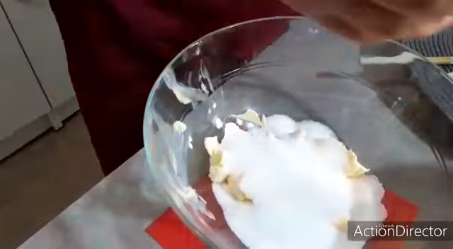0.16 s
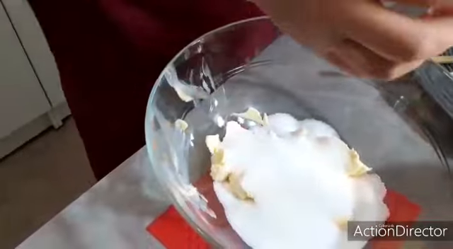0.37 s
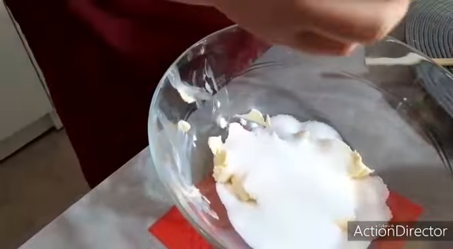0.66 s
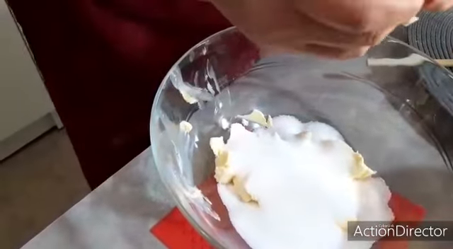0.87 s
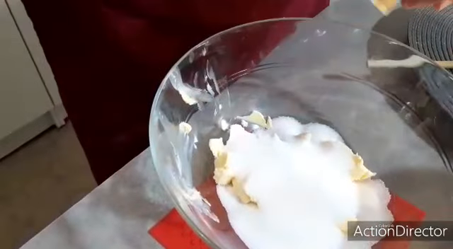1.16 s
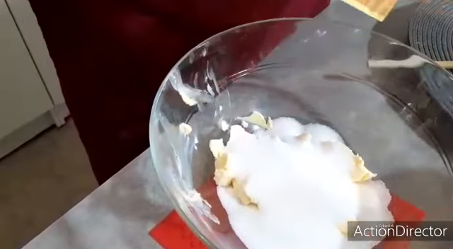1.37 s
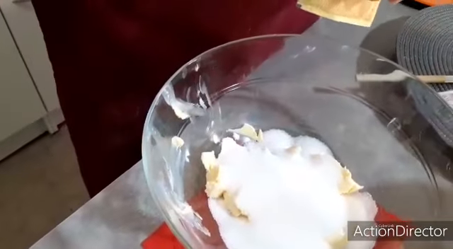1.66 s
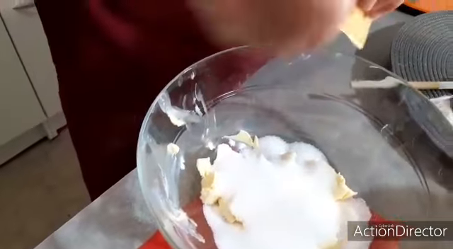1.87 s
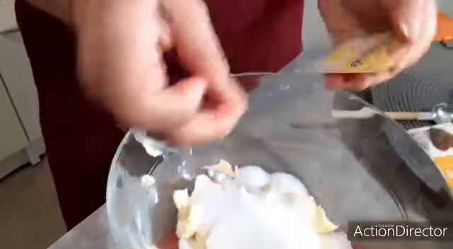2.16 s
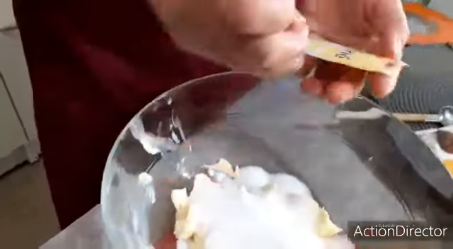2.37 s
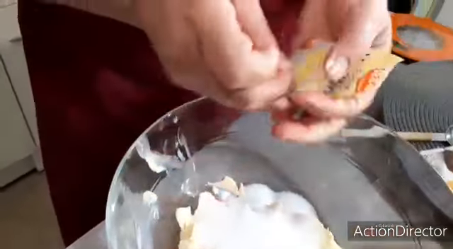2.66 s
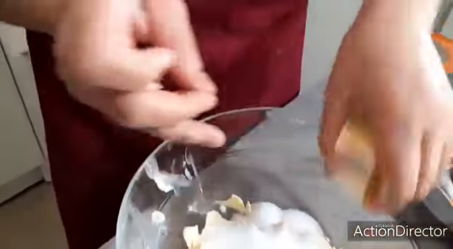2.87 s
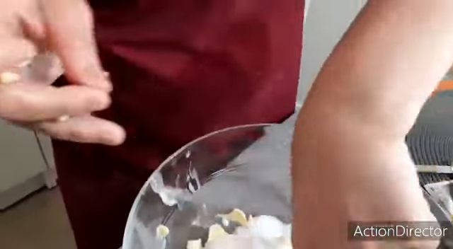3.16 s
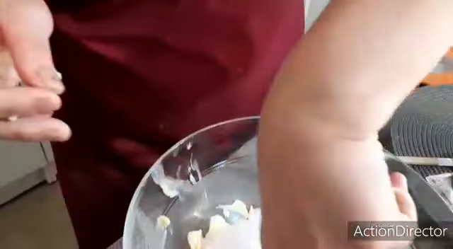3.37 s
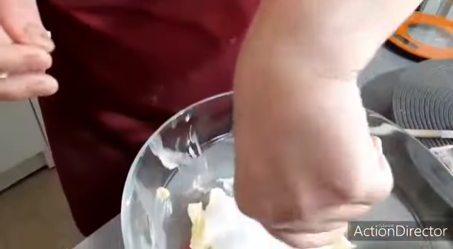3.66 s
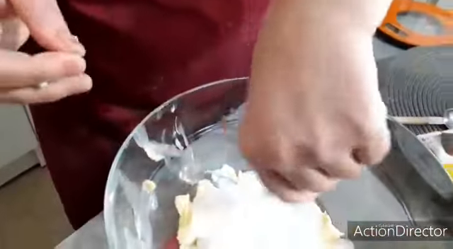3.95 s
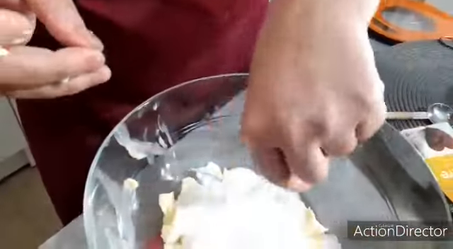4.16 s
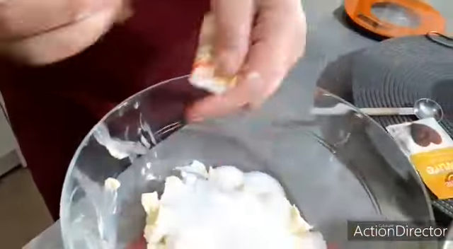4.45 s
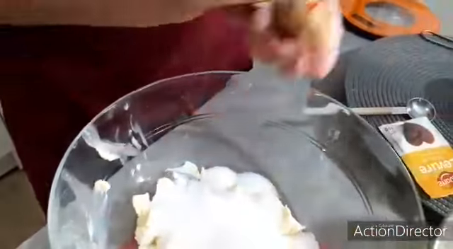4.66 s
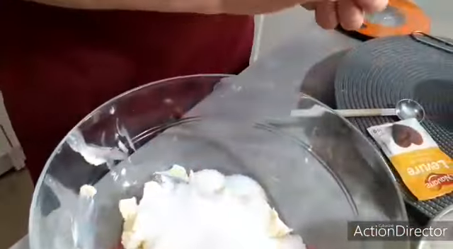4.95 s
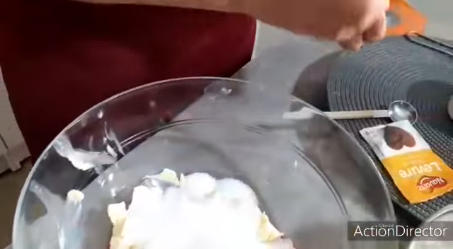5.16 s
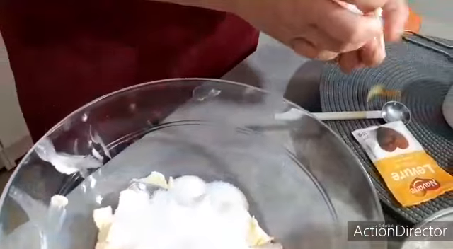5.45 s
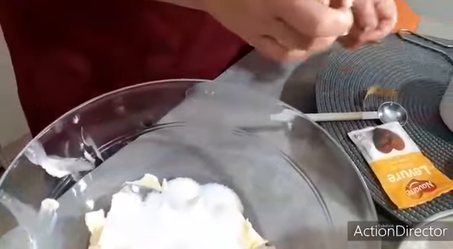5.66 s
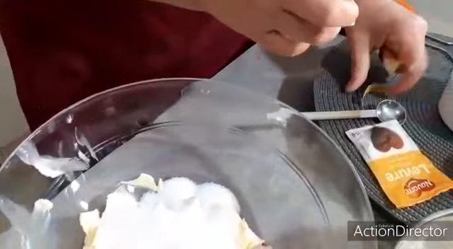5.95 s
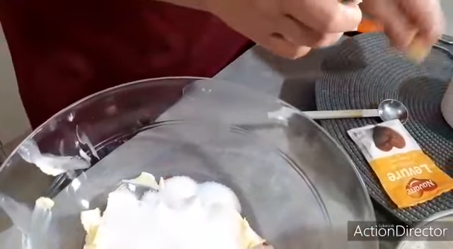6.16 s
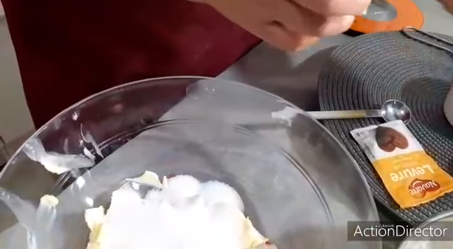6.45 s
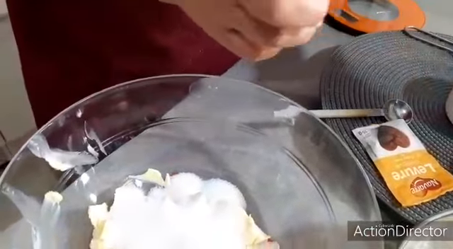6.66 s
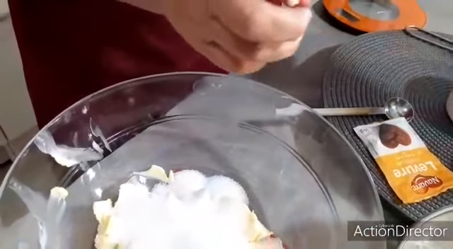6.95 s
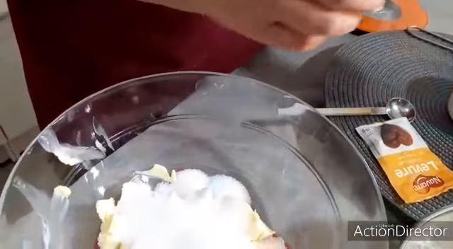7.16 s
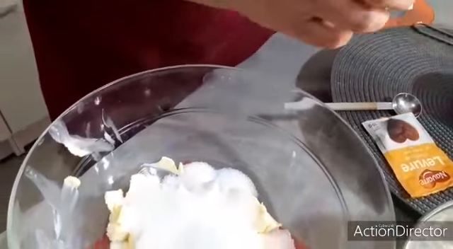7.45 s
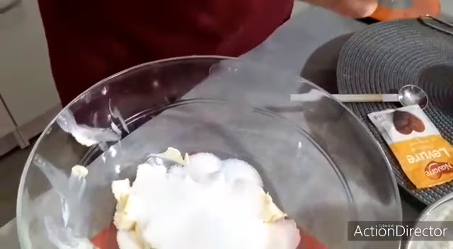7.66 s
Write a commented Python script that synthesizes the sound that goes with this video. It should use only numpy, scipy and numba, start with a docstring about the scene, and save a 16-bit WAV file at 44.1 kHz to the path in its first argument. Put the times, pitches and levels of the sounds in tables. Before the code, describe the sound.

In a small, still kitchen, a paper sachet crackles close to the microphone. Soft fiddling leads to a quick rip and more rustling as it is opened and shaken empty over a glass mixing bowl, which rings hollowly when knocked. Dense, sharp crumpling follows, then higher, crisper folding with short pauses. A few soft, low handling thumps sit underneath.

```python
"""Crisp snaps and rustling: fingers work a paper sachet, then tear it open, shake it out and crumple it.
Small kitchen, over a glass mixing bowl, close to the two microphone ports of a phone.
Creases buckle and ring small flaps of paper; in between, the sheet slides and crackles finely.
The bowl rings hollowly when the hand dips in and takes a few knocks; handling adds soft low thumps.
The room answers every snap over a faint bed of still air."""
import sys
import numpy as np
from scipy import signal
from scipy.fft import rfft, irfft
from scipy.io import wavfile
from scipy.ndimage import uniform_filter1d
from numba import njit

SR = 44100
rng = np.random.default_rng(int(sys.argv[2]) if len(sys.argv) > 2 else 0)


def dump(signal):
    """Clip the signal to [-1, 1] and save it as 16-bit WAV at the path in sys.argv[1]."""
    limited = np.clip(np.atleast_2d(signal).T, -1, 1)
    pcm = np.round(limited * 32767).astype(np.int16)
    wavfile.write(sys.argv[1], SR, pcm)


N = 344024

# Paper at close range, spectra of the ringing sheet, rubbing fibres and cracking fibres: f/Hz, level/dB
SHEET_SPECTRUM = [(500, -61), (900, -16), (1300, 2.5), (1900, 5.5), (2800, 5), (4200, 2.5), (5500, -6.5),
                  (9000, -35.5)]
FIBRE_SPECTRUM = [(2000, -18.5), (3600, -2.5), (4800, 3), (7500, 1.5), (10000, 1.5), (12300, 1), (15500, 0)]
CRACK_SPECTRUM = [(2000, -25), (3600, -1), (5000, -1), (7500, -4), (10000, -8.5), (12300, -2.5),
                  (15500, -7.5)]
# The sachet's hollow body, strong when full or shaken, weak once crushed flat: t/s, level/dB
HOLLOW_BODY = [(0, -5), (.28, -5.5), (.6, -5.5), (.9, -4), (1.3, -14.5), (1.6, -10), (1.85, -0.5),
               (2.05, -9), (2.7, -18.5), (3.0, -14.5), (3.3, -27), (3.41, -4), (3.53, -5), (3.85, -28),
               (4.22, -9), (4.45, -17), (4.7, -15), (4.82, -34), (4.94, -17.5), (5.1, -34.5), (6.25, -35.5),
               (6.5, -29.5), (6.7, -39), (6.89, -20.5), (7.35, -51), (7.66, -28), (7.74, -5.5)]
# Creases that stand out, close to the microphone: t/s, level/dB, flap f/Hz, relative crack level/dB
CREASE_SNAPS = [(.046, -31.5, 2750, 0), (0.0562, -37, 4250, -5), (0.153, -38, 1940, 5),
                (.226, -40, 6200, 3), (.2508, -38.5, 2400, -6), (0.286, -23, 3250, 2),
                (0.346, -42, 5940, 12), (.352, -29.5, 3320, -1), (0.4903, -49, 5200, 7),
                (0.5076, -43.5, 6740, 11), (0.5269, -29, 1650, 2.5), (.585, -29.5, 930, -3.5),
                (0.8279, -39, 1900, -3), (0.8544, -43, 1770, -14), (.976, -42.5, 2820, 3),
                (0.9953, -29.5, 2800, 2.5), (1.2075, -31.5, 1680, -12), (1.2991, -32, 2350, 4.5),
                (1.304, -30, 6720, -7), (1.3117, -28.5, 6550, -1), (1.3783, -36, 1820, -7),
                (1.424, -43, 5400, 2), (1.431, -42, 1850, -4), (1.4774, -38, 1850, 5.5),
                (1.514, -44, 1490, -11), (1.616, -37, 4600, 0.5), (1.7897, -28, 1070, -4.5),
                (1.9411, -24, 2100, -9), (2.0073, -28, 1900, 6.5), (2.0475, -23.5, 1890, -7),
                (2.181, -48.5, 1640, -20), (2.412, -41.5, 6530, 4), (2.438, -45.5, 1280, -7),
                (2.4712, -38.5, 4300, 2.5), (2.5205, -33.5, 3700, -5), (2.571, -44, 7490, 9),
                (2.6149, -26.5, 2840, 9), (2.6935, -33, 3800, 10), (2.697, -24.5, 6140, 0.5),
                (2.7275, -34.5, 1850, 3), (2.8718, -34, 1910, -30), (2.897, -33, 2740, 1.5),
                (2.9062, -34, 1850, -11), (3.0222, -22, 5040, -7.5), (3.3244, -30.5, 2860, -19),
                (3.405, -27.5, 2000, 2.5), (3.4224, -20.5, 1980, -22), (3.4298, -22.5, 2130, 5.5),
                (3.491, -22, 2980, 4.5), (3.51, -24, 1470, 0), (3.531, -19, 1410, -3),
                (3.563, -25, 1575, 4), (3.8572, -43.5, 2900, 1), (3.988, -31, 5000, 8),
                (4.0898, -26, 2450, -2), (4.1041, -15.5, 960, 2), (4.1157, -14, 4500, 2),
                (4.1964, -24.5, 2260, 13), (4.2206, -23, 6920, 11), (4.226, -17, 930, -4),
                (4.406, -25.5, 4700, -9), (4.4303, -25, 7190, 6), (4.4464, -24, 4460, 9.5),
                (4.514, -21, 1170, 2), (4.526, -18.5, 5770, -23), (4.547, -23.5, 3120, 4.5),
                (4.587, -22, 1250, -16.5), (4.6083, -28.5, 7260, 8), (4.6667, -19, 3700, -5),
                (4.678, -20.5, 1140, -18), (4.695, -22.5, 4570, -15), (4.7057, -19, 3520, -3),
                (4.7152, -13.5, 3530, -6.5), (4.763, -20, 7550, 0), (4.7736, -27.5, 3490, 2),
                (4.7801, -25.5, 5040, 11), (4.806, -22, 2900, -12), (4.8434, -21.5, 3300, 7.5),
                (4.8525, -18, 7640, -7), (4.8586, -21, 7600, -5), (4.9023, -29.5, 1370, 4),
                (4.9141, -22, 7400, -13), (4.921, -23.5, 7350, -15), (4.9354, -21.5, 1640, -1),
                (4.942, -22, 3480, 1.5), (5.0408, -23, 1730, 7), (5.0921, -32.5, 1550, 5.5),
                (5.1251, -24.5, 1500, -15), (5.206, -36.5, 3470, -0.5), (5.444, -49.5, 2450, -5),
                (5.502, -45, 2610, 3), (5.6462, -34, 2000, -18), (5.661, -29, 7850, 0.5),
                (5.7219, -26.5, 1700, -11), (5.743, -27, 1980, 5.5), (5.765, -26.5, 2200, 3.5),
                (5.7944, -23.5, 2480, 7.5), (5.815, -20.5, 5550, -1.5), (5.868, -19, 5160, -1),
                (5.949, -40.5, 4000, 0), (6.08, -39, 7300, 3), (6.2324, -44.5, 4030, -2),
                (6.2661, -25, 5300, -10), (6.3242, -37, 5700, 4.5), (6.331, -36.5, 2150, 3.5),
                (6.34, -30, 6430, -30.5), (6.3798, -28.5, 8000, 1), (6.4524, -32.5, 7490, -1),
                (6.4727, -27.5, 5100, 13), (6.476, -26.5, 3470, -3.5), (6.5401, -25.5, 2560, 2),
                (6.5449, -18, 6600, 4), (6.57, -33, 4660, -13), (6.6355, -37, 5070, 3),
                (6.649, -29.5, 5100, -5), (6.6745, -18, 5200, -22), (6.6898, -31.5, 2900, 3),
                (6.6957, -25.5, 4950, 7.5), (6.7261, -31.5, 6800, 5.5), (6.758, -39, 4820, 0),
                (6.7782, -38, 3920, 11), (6.8249, -24, 2600, -7), (6.8283, -22.5, 4800, -17),
                (6.8875, -19.5, 2350, -3.5), (6.9195, -39.5, 7280, 13.5), (7.242, -42, 4300, -9),
                (7.353, -42.5, 6430, 12), (7.4557, -43.5, 3700, -15), (7.7445, -30.5, 2730, -3)]


def snaps(hands_side_db, slip_db=-15, crack_slip_db=-12, sheet_db=-5, thud_hz=680, crease_hz=9500):
    """A crease gives way in a jump and tiny slips: flap and sheet ring, fibres crack, the sachet thuds."""
    size = 1024
    out, t = np.zeros((2, N + size)), np.arange(size) / SR
    jump = 1. * (t == 0)
    no_bass, only_top = (signal.butter(2, hz, "high", fs=SR) for hz in (290, 11500))
    edge = unit(signal.filtfilt(*only_top, np.roll(jump, 12)))
    hollow_db, = curves(HOLLOW_BODY)
    for s, db, flap_hz, crack_db in CREASE_SNAPS:
        start = int(s * SR)
        # each crease faces its own way, near where the hands are
        side_db = hands_side_db[start] + 2 * rng.standard_normal()
        push = jump + undb(slip_db) * stereo_noise(size, 0.63) * fade(t, t60=0.016)
        slips = jump + undb(crack_slip_db) * stereo_noise(size, 0.062) * fade(t, t60=0.015)
        sheet = unit(colour(push, SHEET_SPECTRUM))
        flap_drive = colour(push, SHEET_SPECTRUM if flap_hz < 4500 else FIBRE_SPECTRUM)
        flap = unit(resonate(flap_drive, flap_hz, q=4.2)) + undb(sheet_db) * sheet
        # every crease has its own length, so every crack its own brightness
        crease = resonate(slips, crease_hz * 2 ** rng.uniform(-0.64, 0.74), q=3)
        # the harder it buckles, the sharper the leading edge
        edge_db = -2 + min(db + crack_db + 16, 0) / 2
        crack = unit(colour(slips + 1.1 * crease, CRACK_SPECTRUM)) + undb(edge_db) * edge
        body = resonate(resonate(push.mean(axis=0), thud_hz, q=0.85), thud_hz, q=0.65)
        thud = unit(signal.lfilter(*no_bass, body))
        snap = (undb(-1) * flap * pan(side_db / 2)
                + undb(crack_db) * crack * pan(side_db)
                + undb(hollow_db[start] - 1) * thud)
        out[:, start:start + size] += undb(db) * np.sqrt(SR / 1000) * snap
    return out[:, :N]


# Paper sliding on paper and skin, close up. Fingering first; the top rips off at 1.9 s, opened wide at
# 2.5 s, powder slides out at 3 s, shaken empty from 3.4 s, then crumpled and, from 6 s, folded small.
# start t/s, swell/s, hold/s, level/dB, free sheet f/Hz, relative fibre hiss level/dB
SLIDING_STROKES = [(0, 0.013, 0.064, -45, 3320, -1), (0.114, 0.11, 1.2, -69, 2900, 7.5),
                   (0.126, 0.017, .09, -54.5, 3020, 2.5), (0.274, 0.0045, .07, -44.5, 2960, 5),
                   (0.485, 0.011, 0.12, -53.5, 2650, 4.5), (0.673, 0.032, 0.046, -53.5, 2400, 8),
                   (0.786, .02, .04, -60.5, 2070, 2), (.89, 0.0067, 0.16, -54.5, 2600, 3.5),
                   (1.097, 0.11, 0.035, -64.5, 2610, 9), (1.283, 0.025, 0.018, -48.5, 2430, 2),
                   (1.36, 0.017, 0.15, -61, 2300, -2.5), (1.613, 0.0073, 0.025, -62.5, 2900, 1),
                   (1.783, 0.0073, .11, -56.5, 1730, 3), (1.907, 0.019, 0.044, -35.5, 1950, 4.5),
                   (1.969, 0.034, 0.05, -33, 2660, 4.5), (2.246, 0.017, 0.11, -77.5, 2365, 12.5),
                   (2.395, 0.0036, .11, -55.5, 3280, 7.5), (2.514, .01, 0.0099, -41, 3830, 3.5),
                   (2.585, 0.021, 0.028, -40.5, 3700, 5), (2.665, 0.018, 0.032, -39.5, 3300, 1.5),
                   (2.744, 0.06, 0.092, -57.5, 3520, 6.5), (2.882, 0.0081, 0.19, -49.5, 2600, 1),
                   (3.05, .11, 0.17, -46, 3600, 5.5), (3.4, 0.0032, 0.036, -40.5, 1920, 1),
                   (3.485, 0.0061, 0.078, -44, 2130, 2.5), (3.848, 0.013, 0.026, -57.5, 2620, 2),
                   (3.975, 0.03, 0.033, -47, 2470, 1), (4.068, 0.041, 0.0091, -34.5, 2670, 0.5),
                   (4.198, 0.023, 0.0084, -38, 3540, 8), (4.253, 0.043, 0.096, -47.5, 2950, -2),
                   (4.41, 0.033, 0.045, -40.5, 4000, -2), (4.489, .02, 0.059, -40, 2800, 1),
                   (4.583, 0.022, 0.08, -40.5, 3100, 0.5), (4.652, 0.051, 0.027, -31, 3200, -10),
                   (4.755, 0.015, 0.031, -33.5, 3420, 1.5), (4.823, 0.026, 0.12, -37.5, 3150, 2),
                   (5.007, 0.025, 0.074, -43.5, 2060, 0), (5.185, 0.033, 0.059, -41, 2130, -7.5),
                   (5.292, .03, 0.073, -54, 2290, -1), (5.4, 0.041, 1.3, -67, 2870, -3.5),
                   (5.563, 0.036, 0.062, -56.5, 2450, -3), (5.652, 0.022, 0.3, -49.5, 2320, -1.5),
                   (5.751, 0.04, 0.028, -38.5, 2980, -5), (5.833, 0.046, .012, -41.5, 3800, -2),
                   (5.918, 0.015, 0.018, -72, 3600, -4), (6.103, 0.038, .06, -59, 4350, 0),
                   (6.24, 0.023, 0.011, -40, 3460, -6), (6.295, .03, 0.082, -49, 2800, 1.5),
                   (6.393, 0.027, 0.045, -56, 3370, 15), (6.462, 0.0076, 0.0034, -33.5, 3860, -4.5),
                   (6.447, .1, 0.343, -58, 3700, -9), (6.503, 0.021, 0.053, -44, 3970, 1.5),
                   (6.649, .04, 0.011, -33.5, 4200, -7), (6.792, 0.022, 0.0055, -42.5, 3900, -2),
                   (6.894, 0.0072, 0.021, -47.5, 2630, 3.5), (7.115, 0.031, 0.022, -67.5, 4600, 14),
                   (7.15, 0.083, 0.4, -63.5, 4300, -1.5), (7.306, 0.046, 0.0049, -45.5, 3700, 3.5),
                   (7.404, 0.029, .02, -62.5, 3620, 4), (7.473, 0.041, 0.039, -63, 3940, 2),
                   (7.638, 0.018, 0.0078, -57.5, 4030, 3), (7.705, 0.017, 0.048, -46, 2600, -1.5)]


def hand_effort(sag_db=2, release_t60=0.16, creep_db=-18.5, creep_t60=0.38):
    """Strokes swell, slacken, stop and creep on. Gives level/dB, relative hiss/dB and sheet f/Hz."""
    t = np.arange(N) / SR
    power, hiss, pitch = np.full(N, 1e-12), np.full(N, 1e-12), np.full(N, 3e-9)
    for start, swell, hold, db, hz, hiss_db in SLIDING_STROKES:
        span = slice(int(start * SR), int((start + 1) * SR))
        age = t[span] - start
        rise = np.clip(age / swell, 0, 1)
        slack = np.clip((age - swell) / hold, 0, 1)
        after = np.maximum(age - swell - hold, 0)
        release = fade(after, release_t60) ** 2 + (undb(creep_db) * fade(after, creep_t60)) ** 2
        stroke_power = (undb(db - sag_db * slack) * rise) ** 2 * release
        power[span] += stroke_power
        hiss[span] += stroke_power * undb(hiss_db) ** 2
        pitch[span] += stroke_power * hz
    return 10 * np.log10(power), 10 * np.log10(hiss / power), pitch / power


# Low sound of the sachet flexing, at close range: f/Hz, level/dB
FLEX_SPECTRUM = [(40, -41.5), (130, -12), (240, -9), (330, 4.5), (450, -4.5), (650, -5.5), (1000, -0.5),
                 (1400, -0.5), (2500, -37.5)]


def rustle(effort, crackly, side_db, pops_per_s=700, spread_db=4.5, sheet_db=-2.5):
    """Tiny creases pop at random over the smooth hiss of sliding; both shake the same sheet."""
    db, hiss_db, sheet_hz = effort
    sizes = undb(spread_db * np.minimum(rng.exponential(size=N), 3.3))
    impulses = sizes * (rng.random(N) < pops_per_s / SR)
    pop_decay = fade(np.arange(SR // 100) / SR, t60=0.0017)
    pops = signal.fftconvolve(impulses ** 2, pop_decay)[:N].clip(0)
    # the hand's effort sets the mean power, however the pops happen to fall
    pops /= uniform_filter1d(pops, SR // 20) + 1e-9
    drive = undb(db) * np.sqrt(1 - crackly + crackly * pops)
    ringing = np.array([free_sheet(port, sheet_hz) for port in drive * stereo_noise(N, 0.45)])
    sheet = colour(ringing, SHEET_SPECTRUM) * pan(side_db / 4 + 1.3)
    fibres = colour(drive * undb(hiss_db) * stereo_noise(N, 0.16), FIBRE_SPECTRUM) * pan(side_db)
    flex_db = 0.68 * curves(HOLLOW_BODY)[0] - 2
    flex = colour(drive * undb(flex_db) * stereo_noise(N, 0.72), FLEX_SPECTRUM)
    return undb(sheet_db) * sheet + fibres + flex


def free_sheet(x, hz):
    """The paper between the fingers rings broadly; the shorter the free part, the higher."""
    ringing = sweep(sweep(x, hz, q=0.83), hz, q=0.34)
    return ringing * np.sqrt(np.tan(np.pi * hz / SR))


def ticks(effort, crackly, side_db, full_rate_per_s=140, tick_db=-5, spread_db=3):
    """Small stray creases click while the paper is worked, each with a flap of its own size."""
    db, _, sheet_hz = effort
    size, candidates = 512, 1500
    out, jump = np.zeros((2, N + size)), 1. * (np.arange(size) == 0)
    for when, chance, pitch, strength, side in rng.random((candidates, 5)):
        i = int(when * N)
        if chance * candidates < full_rate_per_s * crackly[i] * N / SR:
            hz = sheet_hz[i] * 2 ** (1.6 * pitch - 0.75)
            level_db = db[i] + tick_db + spread_db * min(-np.log(strength), 3)
            flap = unit(resonate(resonate(jump, hz, q=5), hz, q=0.99))
            placement = pan(side_db[i] / 2 + 14 * (side - .5))
            out[:, i:i + size] += undb(level_db) * np.sqrt(SR / 250) * flap * placement
    return out[:, :N]


def folded_layers(x, hz=7000, start_s=3.5, end_s=7.6):
    """As the sachet is folded, its tight layers increasingly favour one high, crisp band."""
    gain = undb(-2) * np.interp(np.arange(N) / SR, [start_s, end_s], [0, 1])
    return (x + gain * resonate(x, hz, q=2.34)) / (1 + gain / 4)


def cupped_palms(x, echo=0.44, delay_range_ms=(0.39, 1.465), moves_per_s=7):
    """The palms throw the sound straight back: a hollow colour that shifts as they move."""
    clock, hold = np.arange(N), int(SR / moves_per_s)
    out = []
    for port in x:
        steps_ms = np.repeat(rng.uniform(*delay_range_ms, N // hold + 1), hold)[:N]
        delay_ms = uniform_filter1d(steps_ms, hold // 3)
        back = np.interp(clock - delay_ms * SR / 1000, clock, port)
        out.append(port + echo * resonate(back, hz=2400, q=0.24))  # skin returns only the mids
    return np.array(out)


def facing_microphone(x, top_db, lag_ms):
    """The sachet beams its top octave on or off axis, and reaches the two ports at different times."""
    top = signal.sosfiltfilt(signal.butter(3, 10300, "high", fs=SR, output="sos"), x)
    left, right = x + (undb(top_db) - 1) * top
    clock = np.arange(N)
    late_left = np.interp(clock - np.round(lag_ms * SR / 1000), clock, left)
    return np.array([late_left, right])


# Air modes of the glass bowl, just under the hands: f/Hz, relative level/dB, t60/s
BOWL_MODES = [(336, -8.5, 0.29), (594, -3, 0.1), (635, 4.5, 0.11), (690, -11.5, 0.22), (1066, -2, 0.061),
              (1492, -3, 0.058), (1850, 0, 0.036), (1980, -16.5, 0.22), (2740, -4, 0.059),
              (3300, -14.5, 0.1)]


def bowl(x, gain_db=5):
    """The air in the bowl rings on after the paper."""
    modes = (undb(db) * resonate(x, hz, q=np.pi * hz * t60 / np.log(1000)) for hz, db, t60 in BOWL_MODES)
    return undb(gain_db) * sum(modes)


# Soft low thumps of handling, and hollow knocks of the bowl, nearby: t/s, f/Hz, level/dB, t60/s
THUMPS_AND_BOWL_KNOCKS = [(.004, 265, -44.5, 0.29), (.02, 72.5, -44, 0.19), (.045, 179, -54, 0.091),
                          (.286, 406, -42.5, 0.4), (1.998, 85.4, -50, 0.2), (2.049, 133, -48, 0.11),
                          (3.02, 329, -36.5, 0.15), (3.023, 490, -42, 0.045), (3.508, 359, -26, 0.088),
                          (3.509, 641, -25.5, 0.13), (5.503, 697, -57.5, 0.24), (6.032, 740, -51.5, 0.13),
                          (6.1, 683, -54, 0.14), (6.126, 71, -49.5, 0.14), (6.148, 810, -56.5, .08),
                          (7.456, 107.8, -55.5, 0.12), (7.708, 303, -52, 0.11), (7.742, 327, -46, 0.14)]


def thumps_and_bowl_knocks():
    """Dull, quickly damped thumps and knocks, mostly a rattle of noise around a fainter pure tone."""
    out, t = np.zeros((2, N + SR // 2)), np.arange(SR // 2) / SR
    for s, hz, db, t60 in THUMPS_AND_BOWL_KNOCKS:
        rattle = resonate(resonate(stereo_noise(len(t), 0.91), hz, q=1.8), hz, q=1.8)
        ring = 0.44 * np.sin(2 * np.pi * hz * t) + 0.72 * rattle / rattle.std()
        envelope = fade(t, t60) * (1 - np.exp(-t * hz))
        start = int(s * SR)
        out[:, start:start + len(t)] += undb(db) * ring * envelope
    return out[:, :N]


# Reverberation of the small kitchen, all round the microphone: f/Hz, t60/s, level/dB
ECHO_BANDS = [(200, 0.41, -11), (554, 0.27, -9), (1400, 0.23, -12), (3700, 0.27, -17), (8000, 0.16, -13),
              (14000, 0.035, -12.5)]


def kitchen_echo(x, early_db=-13, build_s=0.0066, echoes_per_s=1200):
    """Early echoes from worktop and bowl, then a short diffuse tail that dulls as it dies."""
    t = np.arange(SR // 2) / SR
    centres, t60s, dbs = np.transpose(ECHO_BANDS)
    hz = np.fft.rfftfreq(len(t), 1 / SR) + 1
    spectrum = rfft(stereo_noise(len(t), 0))
    spectrum += (spectrum[0] - spectrum) * np.exp(-(hz / 600) ** 2)  # long waves reach both ports alike
    onset = np.clip(t / build_s - .5, 0, 1)
    tail = 0
    for weights, t60, db in zip(np.eye(len(centres)), t60s, dbs):
        band = irfft(spectrum * np.interp(np.log(hz), np.log(centres), weights), len(t))
        tail = tail + undb(db) * band * unit(fade(t, t60) * onset)
    reflections = stereo_noise(len(t), 0.1) * (rng.random(len(t)) < echoes_per_s / SR)
    early = unit(reflections * (t > .002) * fade(t, t60=0.036))
    return signal.fftconvolve(x, tail + undb(early_db) * early, axes=1)[:, :N]


# Room tone of the kitchen, behind everything: f/Hz, relative level/dB
AIR_SPECTRUM = [(25, -39), (65, -0.5), (130, 1), (210, 4.5), (260, -7.5), (340, 6.5), (480, -12.5),
                (900, -15.5), (2500, -18), (8000, -19), (15500, -24.5)]


def room_tone(level_db=-72):
    """Still kitchen air: a faint, steady, low noise."""
    return undb(level_db) * colour(stereo_noise(N, 0.68), AIR_SPECTRUM)


def undb(db):
    """Decibels to gain."""
    return 10 ** (np.asarray(db) / 20)


def curves(table):
    """Each column of a timed table, sample by sample."""
    s, *columns = np.transpose(table)
    return [np.interp(np.arange(N) / SR, s, column) for column in columns]


def unit(x):
    """Scale to a mean energy of one per channel."""
    return x / np.sqrt(np.mean(np.sum(x ** 2, axis=-1)) + 1e-20)


def colour(x, points, size=2048):
    """Causal filter with an (f/Hz, level/dB) shape that keeps the power of white noise."""
    hz, db = np.transpose(points)
    log_hz = np.log(np.fft.rfftfreq(size, 1 / SR) + 1)
    log_gain = np.log(undb(np.interp(log_hz, np.log(hz), db)))
    cepstrum = irfft(log_gain)[:size // 2]
    cepstrum[1:] *= 2  # minimum phase
    response = unit(irfft(np.exp(rfft(cepstrum, size))))
    return signal.fftconvolve(x, response[None], axes=1)[:, :x.shape[1]]


def resonate(x, hz, q):
    """One resonance, held to at most SR / 3 and a q of at least 0.7."""
    return signal.lfilter(*signal.iirpeak(min(hz, SR / 3), max(q, .7), fs=SR), x)


@njit
def sweep(x, hz, q):
    """A resonance whose centre moves; white noise keeps about its power."""
    out, band_state, low_state = np.empty(len(x)), 0., 0.
    for i in range(len(x)):
        g = np.tan(np.pi * hz[i] / SR)
        band = (band_state + g * (x[i] - low_state)) / (1 + g * (g + 1 / q))
        band_state = 2 * band - band_state
        low_state += 2 * g * band
        out[i] = band / np.sqrt(g * q)
    return out


def fade(t, t60):
    """Amplitude that falls 60 dB in t60."""
    return np.exp(-np.log(1000) * t / t60)


def stereo_noise(size, correlation):
    """Left and right white noise with a shared part."""
    noise = rng.standard_normal((3, size))
    return np.sqrt(correlation) * noise[0] + np.sqrt(1 - correlation) * noise[1:]


def pan(db):
    """Gains of constant total power, the left db above the right."""
    gains = undb(np.array([db, -db]) / 2).reshape(2, -1)
    return gains / np.sqrt(np.mean(gains ** 2, axis=0))


# The hands, close to the microphone and above the bowl: t/s, treble left minus right/dB,
# left port lag/ms, top octave level/dB, crackly share of the rustle/0-1, bowl coupling/dB
HAND_MOVES = [(0, -4.5, 0.24, 5, 0.94, -17), (.7, -13.5, 0.11, 1.5, 0.51, -20),
              (1.5, -23, 0.13, 5.5, 0.37, -19.5), (2.0, -12, 0.017, 6.5, 0.5, -1),
              (2.2, 8.5, 0.13, 0.5, 0.5, -16), (2.5, 2.5, 0.059, 1, 0.32, 1),
              (2.95, 2, -0.07, -0.5, 0.75, -8), (3.2, 3, -0.1, 1, 0.1, -24), (3.42, 0, 0.092, 0.5, 0.34, 0),
              (3.6, 3, 0.026, -10, 0.2, -4), (4.1, 2, -0.079, -4, 0.49, -3.5),
              (4.7, 5, -0.12, 0, 0.53, -26), (5.2, -1.5, 0.078, -0.5, 0.03, -5),
              (5.8, 1, 0.086, -1, 0.93, -7), (6.45, 2, 0.28, -5.5, 0.4, -40),
              (6.85, -1, 0.33, 0.5, 0.56, -29.5), (7.3, 0.5, 0.24, -3, 0.4, -38),
              (7.75, -3.5, 0.37, 1, 0.4, -26)]


def scene():
    """At the microphone: paper in front, bowl and handling thumps nearby, the kitchen behind."""
    side_db, lag_ms, top_db, crackly, bowl_db = curves(HAND_MOVES)
    effort = hand_effort()
    paper = snaps(side_db)
    paper += folded_layers(rustle(effort, crackly, side_db))
    paper += ticks(effort, crackly, side_db)
    paper = facing_microphone(cupped_palms(paper), top_db, lag_ms)
    # the bowl answers more strongly the deeper the hand reaches into it
    near = paper + bowl(paper.mean(axis=0) * undb(bowl_db)) + thumps_and_bowl_knocks()
    return near + kitchen_echo(near) + room_tone()


def record(dry):
    """The phone cuts off the very top, above 15.7 kHz."""
    return signal.sosfilt(signal.ellip(8, .2, 70, 15700, fs=SR, output="sos"), dry)


dry = scene()
out = record(dry)
dump(out)
```